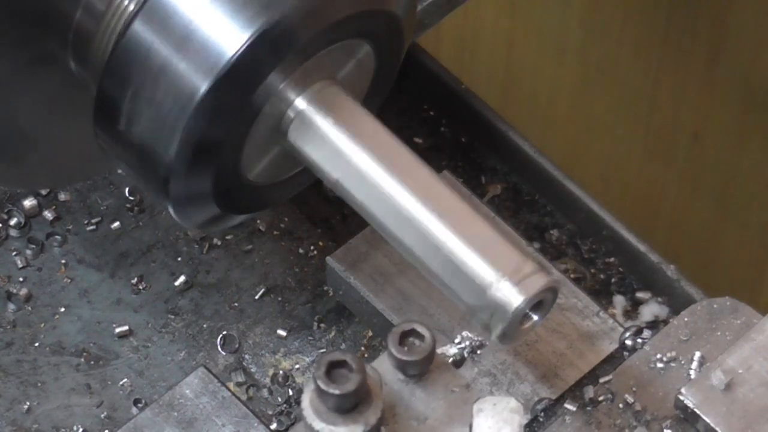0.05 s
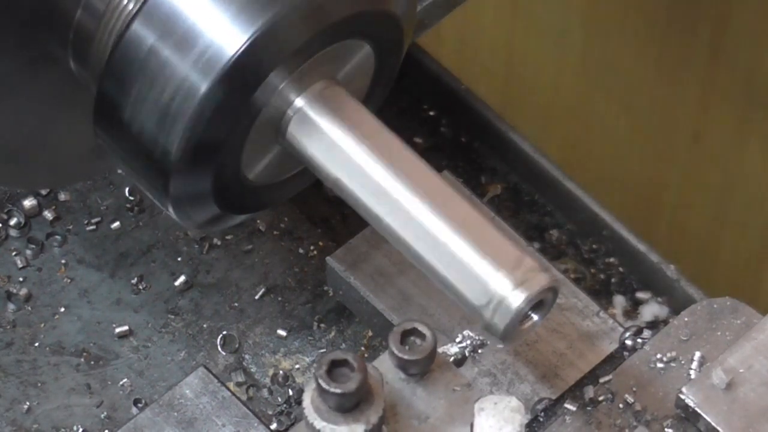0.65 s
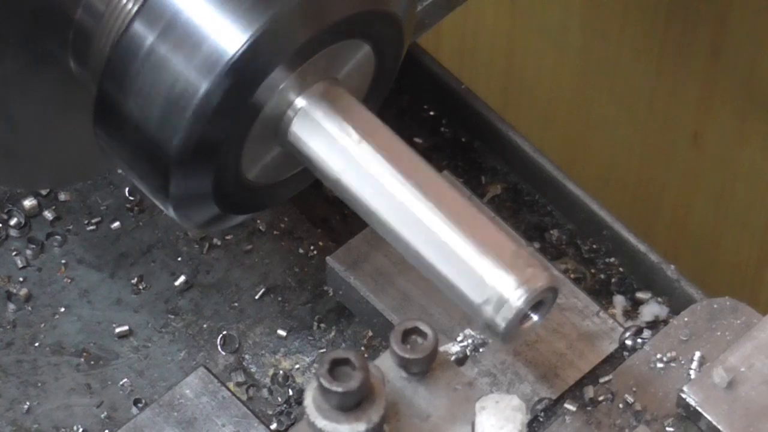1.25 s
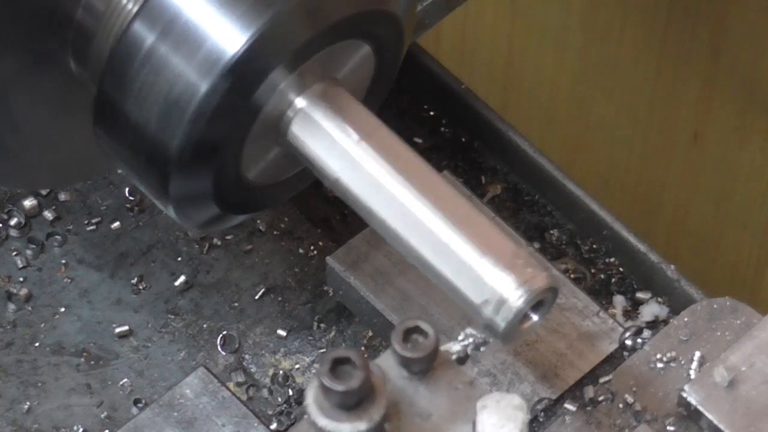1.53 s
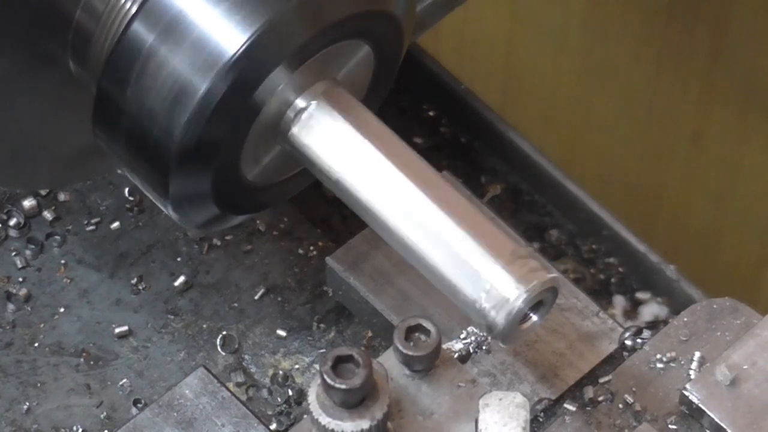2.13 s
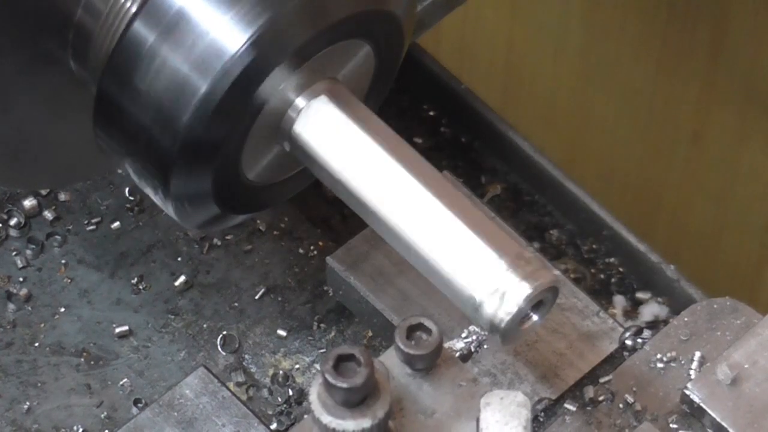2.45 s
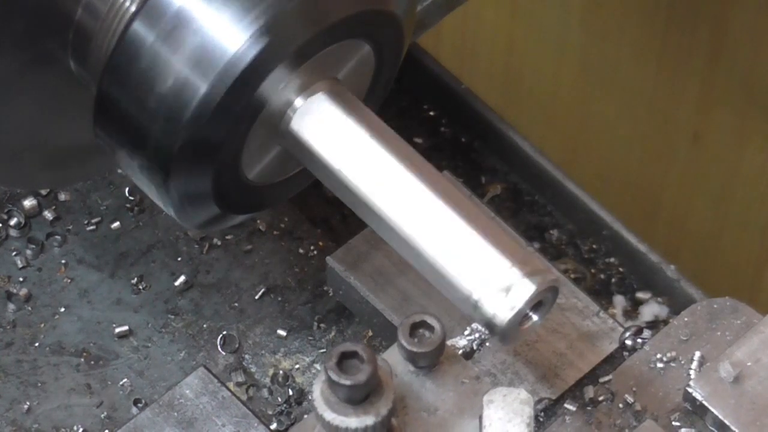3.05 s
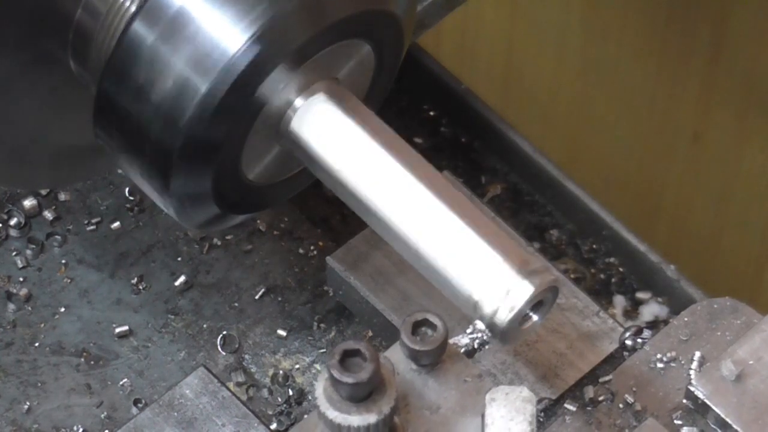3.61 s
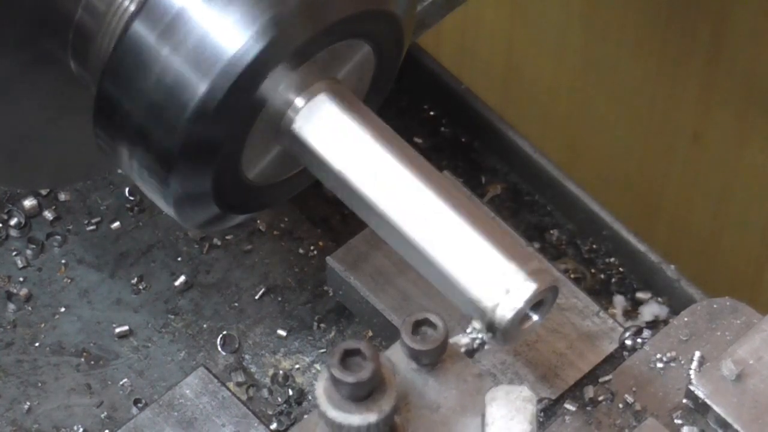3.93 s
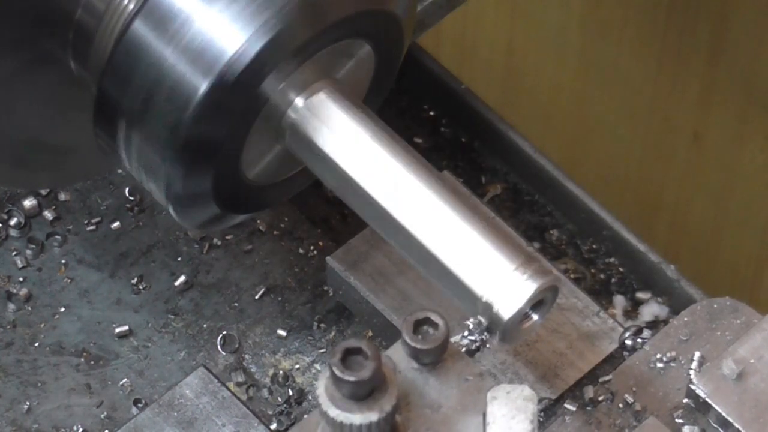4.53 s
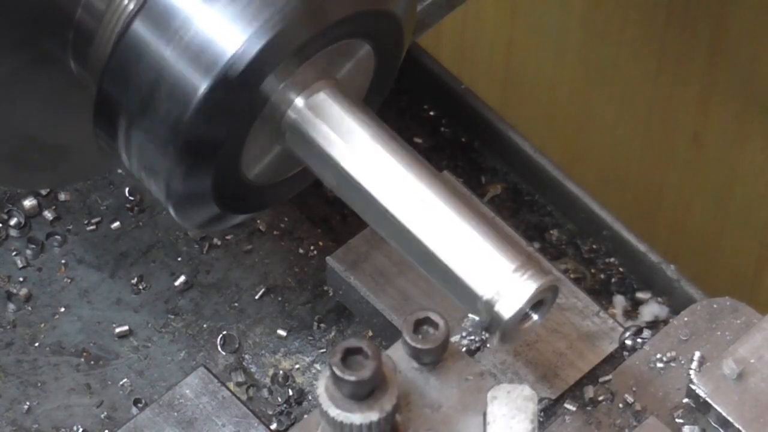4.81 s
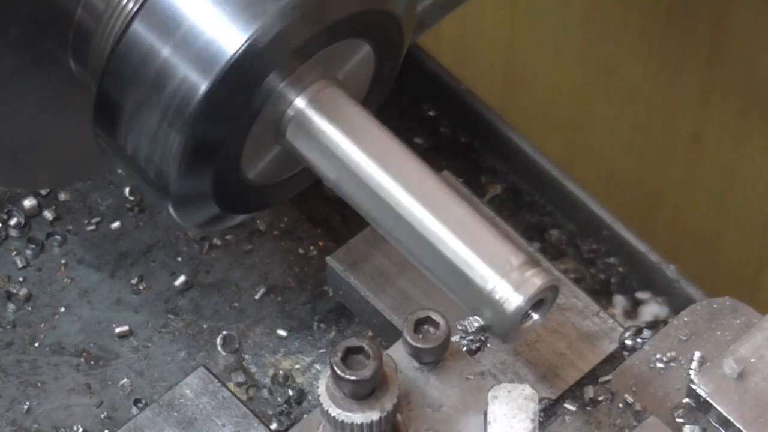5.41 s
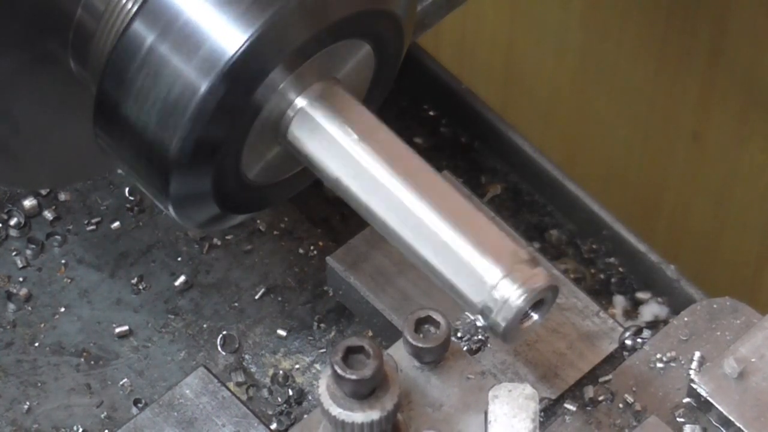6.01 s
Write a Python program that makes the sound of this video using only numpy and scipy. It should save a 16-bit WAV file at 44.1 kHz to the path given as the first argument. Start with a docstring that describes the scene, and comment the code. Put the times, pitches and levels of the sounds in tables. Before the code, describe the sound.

A lathe idles in a small workshop with a steady motor hum, whining, rumbling gears and a bearing hiss. Faint belt scuffs and rattles of metal shavings come through. A little past halfway the tool grazes a spinning steel bar, then bites in with loud, rapid knocking, gritty scraping and a ringing chatter. The hot chip starts to sizzle near the end. The microphone is close and the room sounds dull.

```python
"""A lathe idles in a small workshop: the motor hums, the headstock gears whine and rumble, a bearing
hisses, the belt scuffs and loose swarf rattles. Near 3.5 s a spinning stainless bar grazes the parting tool.
From 3.9 s the tool bites twice a turn, entering and leaving an arc of metal; the chip rubs without pause
and the tool chatters. As the groove deepens the arc widens, the thuds soften and the hot chip sizzles."""
import sys
import numpy as np
from scipy import signal
from scipy.fft import rfft, irfft
from scipy.io import wavfile
from scipy.ndimage import uniform_filter1d, minimum_filter1d

SR = 44100
rng = np.random.default_rng(int(sys.argv[2]) if len(sys.argv) > 2 else 0)


def transcribe(signal):
    """Save signal, clipped to [-1, 1], as a 16-bit WAV file at the path in sys.argv[1]."""
    frames = np.atleast_2d(signal).T
    limited = np.clip(frames, -1, 1)
    pcm = np.round(limited * 32767).astype(np.int16)
    wavfile.write(sys.argv[1], SR, pcm)


N = 276066
TIME = np.arange(N) / SR
FREQ = np.maximum(np.arange(4097) * SR / 8192, 1)
HUM_HZ = 99.9  # twice the mains frequency
TURN_S, CUT_START_S = .04665, 3.922  # one turn of the spindle; the first full bite

# the high side of the bar brushes the tool before the cut: (time [s], knock [dB], grit [dB], rub [dB])
GRAZES = [(3.458, -42, -50, -37.5), (3.505, -39, -41.5, -34), (3.690, -12, -23.5, -24.5),
          (3.737, -18, -31.5, -24), (3.875, -18, -32, -24)]
# how hard the cut works: (time [s], entry knock [dB], exit knock [dB], chip rub [dB], entry grit [dB])
CUT = [(3.92, -11, -15, -34, -25), (4.1, -17, -18, -26, -28), (4.2, -20, -16.5, -26.5, -31.5),
       (4.34, -16, -15.5, -27.5, -29.5), (4.48, -22.5, -18.5, -27.5, -33.5),
       (4.64, -18.5, -15.5, -26.5, -30), (4.75, -22.5, -17, -26.5, -34.5), (4.9, -17.5, -20, -25.5, -32.5),
       (5.09, -17, -16.5, -24, -31.5), (5.16, -17, -22, -25.5, -33.5), (5.27, -15.5, -14, -24, -30),
       (5.44, -19.5, -25, -28, -37.5), (5.63, -16.5, -15.5, -24, -32.5), (5.72, -16, -19, -24.5, -36),
       (5.87, -18.5, -24, -25, -35), (6.115, -16, -27, -26.5, -41.5), (6.165, -27.5, -27, -27, -40)]


def undb(db):
    """Decibels to gain."""
    return 10 ** (np.asarray(db) / 20)


def curve(rows, column=1):
    """Automation lane: one column of a timed table, joined by straight lines."""
    rows = np.array(rows)
    return np.interp(TIME, rows[:, 0], rows[:, column])


def colour(points):
    """An EQ curve in dB, joined on a log-frequency axis."""
    hz, db = np.transpose(points)
    return np.interp(np.log(FREQ), np.log(hz), db)


def resonance(hz, width, db):
    """A bell-shaped lift in a spectrum."""
    return db / (1 + (2 * (FREQ - hz) / width) ** 2)


def response(db):
    """Minimum-phase impulse response with this spectrum."""
    cepstrum = irfft(np.log(undb(db)))
    half = len(FREQ) - 1
    cepstrum[1:half] *= 2
    cepstrum[half + 1:] = 0
    return irfft(np.exp(rfft(cepstrum)))[:half]


def ring(force, db):
    """Send a force through a body with this spectrum, scaled to unit energy."""
    body = response(db)
    return signal.fftconvolve(force, body / np.linalg.norm(body))[:N]


def walk(rate):
    """Smooth random drift with spread 1 that changes about rate times a second."""
    hold = max(int(SR / rate), 1)
    steps = np.repeat(rng.standard_normal(N // hold + 2), hold)
    smooth = uniform_filter1d(uniform_filter1d(steps, hold), hold)[:N]
    return smooth / smooth.std()


def crackle(rate, scatter_db):
    """Tiny clicks of uneven size, rate a second, with power 1."""
    sizes = rng.choice([-1, 1], N) * undb(scatter_db * rng.standard_normal(N))
    clicks = sizes * (rng.random(N) < rate / SR)
    return clicks / clicks.std()


def blows(times, db):
    """One sharp impulse at each time."""
    force = np.zeros(N)
    np.add.at(force, np.clip((times * SR).astype(int), 0, N - 1), undb(db))
    return force


def bursts(times, db, peak_s, sharp):
    """Envelope of pushes that peak after peak_s and die away; a higher sharp makes them tighter."""
    age = np.arange(1, SR // 10) / SR / peak_s
    return signal.fftconvolve(blows(times, db), (age * np.exp(1 - age)) ** sharp)[:N]


def tone(hz, db):
    """A sine on a moving pitch, with this rms level."""
    return np.sqrt(2) * undb(db) * np.sin(2 * np.pi * (np.cumsum(hz) / SR + rng.random()))


def echoes(sound, t60, delay_s, db):
    """A dying cloud of reflections."""
    age = np.arange(SR // 2) / SR
    fade = np.exp(-np.log(1000) * age / t60) * (age > delay_s)
    cloud = rng.standard_normal(len(age)) * fade / np.linalg.norm(fade)
    return undb(db) * signal.fftconvolve(sound, cloud)[:N]


def belt(delay_s, width_s):
    """A smooth bump from 0 to 1 each time the stiff spot of the drive belt comes round."""
    pass_s, period_s = 0.283, .2668
    offset = (TIME - pass_s - delay_s + period_s / 2) % period_s - period_s / 2
    return np.exp(-(offset / width_s) ** 2)


def drive_tones():
    """Mains hum that dips with the belt, motor tones, and gear tones wavering with the play of the teeth."""
    # motor hum, sinking as the cut takes hold and then recovering: (time [s], level [dB])
    hum_levels = [(0, -36.5), (3.8, -36.5), (4.1, -45.5), (4.6, -45.5), (5.2, -42), (5.7, -40.5),
                  (6.1, -36)]
    # magnetic and rotor-slot tones: (pitch [Hz], level [dB])
    motor_tones = [(299.8, -49), (399.7, -48), (499.6, -45), (599.4, -58.5), (799.1, -52.5), (899.2, -59),
                   (1091.3, -66), (1291.0, -47), (1390.9, -48), (1490.8, -55), (1790.6, -67)]
    # whine of the gear teeth: (pitch [Hz], level [dB])
    gear_tones = [(422, -55), (818.6, -50.5), (868.4, -49.5), (968.0, -60), (1167.8, -55), (1216.6, -56),
                  (1539.0, -61)]
    dip_db = 4.7 * belt(delay_s=0, width_s=0.018)
    hum = tone(HUM_HZ + 0.19 * walk(5.0), curve(hum_levels) + 0.55 + 1.3 * walk(21.9) - dip_db)
    motor = sum(tone(hz + 0.34 * walk(5.87), db + 1.4 * walk(9.08)) for hz, db in motor_tones)
    gears = sum(tone(hz + 1.21 * walk(11.82), db - 3.5 + 3 * walk(7.4)) for hz, db in gear_tones)
    return hum + motor + gears


def headstock():
    """Gears and bearings rattle finely, throbbing with the motor; the hiss swells with each belt pass."""
    # rumble and hiss of the headstock: (frequency [Hz], gain [dB])
    housing_eq = [(45, -24.5), (110, -5.5), (200, -5.5), (280, -3), (400, -3.5), (500, 2.5), (580, -0.5),
                  (700, -6), (890, -1.5), (1020, -5.5), (1290, -1.5), (1480, -6.5), (1750, -17.5),
                  (2250, -21.5), (2600, -29.5), (4300, -21.5), (5500, -19.5), (9500, -37), (15000, -45.5)]
    throb = 1 + 0.16 * np.sin(2 * np.pi * HUM_HZ * TIME)
    swell_db = 1.6 * belt(delay_s=0.028, width_s=0.019)
    rattle = crackle(rate=3000, scatter_db=1.5) * throb * undb(-39.0 + walk(25.22))
    hiss = crackle(rate=14000, scatter_db=4.0) * throb
    hiss *= undb(-50.5 + swell_db + 0.63 * walk(17) + 1.3 * walk(60))
    grains = crackle(rate=48, scatter_db=2.5) * undb(-61)  # stray grains tick in the bearing
    spectrum = colour(housing_eq) + resonance(hz=5425, width=145, db=6.5)  # a bearing race rings
    treble = 1 / (1 + (2500 / FREQ) ** 8)  # crossover at 2500 Hz
    lows = ring(rattle, spectrum + 10 * np.log10(1 - treble + 1e-9))
    highs = ring(hiss + grains, spectrum + 10 * np.log10(treble + 1e-9))
    return lows + highs


def scuffs():
    """The belt scuffs lightly against its pulley."""
    # belt scuffs: (time [s], level [dB])
    hits = [(.300, -47), (.330, -49), (1.093, -46), (1.368, -50), (1.893, -47), (2.442, -50), (2.70, -48),
            (2.965, -51), (2.992, -47)]
    # their thin rasp: (frequency [Hz], gain [dB])
    scuff_eq = [(2000, -30), (3300, -3), (4300, 4), (5500, 4), (6500, -15), (12000, -37)]
    envelope = bursts(*np.transpose(hits), peak_s=0.0045, sharp=.7)
    return ring(envelope * crackle(rate=4500, scatter_db=2), colour(scuff_eq))


def swarf():
    """Loose curls of metal rattle softly against the machine."""
    # swarf rattles: (time [s], level [dB])
    hits = [(.2, -51), (.75, -52), (1.138, -42), (1.865, -46), (2.695, -45), (3.648, -39)]
    # ring of the curls: (frequency [Hz], gain [dB])
    curl_eq = [(800, -35), (1700, 10), (2800, -15), (4050, -1), (5200, -10), (9000, -22), (15000, -38)]
    envelope = bursts(*np.transpose(hits), peak_s=0.0046, sharp=0.92)
    return ring(envelope * crackle(rate=3800, scatter_db=-0.5), colour(curl_eq))


def steel():
    """Spectrum of tool, post and bar ringing together."""
    # their broad tone colour: (frequency [Hz], gain [dB])
    body_eq = [(130, -10.5), (220, -1), (450, 0.5), (700, -10.5), (1100, -5), (1600, -3.5), (2200, -11.5),
               (3000, -14.5), (4500, -18.5), (6500, -25), (9000, -34), (15000, -49.5)]
    # their resonances: (frequency [Hz], width [Hz], lift [dB])
    modes = [(255, 37, 9), (363.6, 103, 9), (589.7, 71, 13), (724.5, 68, 11.5), (792, 140, 4.5),
             (914, 120, 10.5), (996, 123, 3), (1191, 110, 7), (1284, 33, 4.5), (1478, 18, 7.5),
             (1910, 35, 2), (2048, 62, 5), (2194, 56, 7.5), (2540, 25, 0), (2600, 19, 5), (4030, 100, 4.5),
             (4400, 160, 7), (4850, 170, 5.5), (5260, 270, 5)]
    return colour(body_eq) + sum(resonance(*mode) for mode in modes)


def recut(roughness, memory=.48):
    """The tool meets the marks it left one turn before, so its coarser roughness partly repeats."""
    turn = int(TURN_S * SR)
    by_turn = np.resize(roughness, (N // turn + 1, turn))
    marks = signal.lfilter([1], [1, -memory], by_turn, axis=0).ravel()[:N]
    lowpass = signal.butter(2, 2300, fs=SR, output="sos")
    return roughness + signal.sosfiltfilt(lowpass, marks / marks.std() - roughness)


def engaged():
    """Fades from 0 to 1 over the turn in which the cut takes hold."""
    return np.clip((TIME - CUT_START_S) / TURN_S + 1, 0, 1)


def arcs():
    """When the tool enters the metal on each turn, and when it leaves."""
    # the cutting arc, widening with depth: (time [s], duration [s])
    arc_lengths = [(3.9, 0.011), (6.26, 0.0298)]
    start = CUT_START_S + TURN_S * np.arange(int((TIME[-1] - CUT_START_S) / TURN_S) + 1)
    return start, start + np.interp(start, *np.transpose(arc_lengths))


def rubbing():
    """The chip sticks and slips over the tool face after each graze and all through the cut."""
    # force of the sliding chip: (frequency [Hz], gain [dB])
    slide_eq = [(50, -27), (130, 5.5), (200, -2.5), (280, -7.5), (450, 4.5), (900, -5), (1800, 1.5),
                (2900, 0), (4500, -6.5), (9000, -2), (15000, -6)]
    graze_s, _, _, graze_db = np.transpose(GRAZES)
    swell_db = 0.1 * np.cos(2 * np.pi * (TIME - CUT_START_S - 0.022) / TURN_S)
    pressure = engaged() * undb(curve(CUT, column=3) + swell_db)
    pressure += bursts(graze_s, graze_db, peak_s=.014, sharp=0.8)
    slips = recut(crackle(rate=7000, scatter_db=3.0)) * pressure * undb(1.07 * walk(90))
    return ring(slips, steel() + colour(slide_eq))


def sizzle():
    """The hot chip sizzles as the groove deepens."""
    # rise of the sizzle: (time [s], level [dB])
    levels = [(3.7, -90), (3.95, -66), (5.3, -68), (5.85, -52.5), (6.26, -50)]
    # its bright fizz: (frequency [Hz], gain [dB])
    fizz_eq = [(4000, -12), (6300, 7), (7200, -2), (8100, 7), (8550, 5), (8950, -5), (9400, -7), (9900, 5),
               (11000, -7), (16000, -15)]
    fizz = crackle(rate=9100, scatter_db=5.5) * undb(curve(levels) + 3.9 * walk(90))
    return ring(fizz, colour(fizz_eq))


def chatter():
    """The cut keeps tool and post swinging at their own pitches; the tool swings widest after each exit."""
    # the tool's main swing, a little higher in a deeper groove: (time [s], level [dB], pitch [Hz])
    swing = [(3.9, -34, 360), (4.15, -21.5, 357), (4.33, -29, 358), (4.39, -22.5, 355), (4.6, -23.5, 356),
             (4.9, -27.5, 364), (5.02, -19.5, 364), (5.12, -16.5, 366), (5.19, -25.5, 364),
             (5.3, -20.5, 366), (5.4, -13.5, 367), (5.46, -24, 368), (5.55, -18.5, 368), (5.78, -22, 366),
             (5.87, -16, 364), (5.94, -21.5, 366), (6.19, -22.5, 366), (6.24, -17.5, 364)]
    # higher modes of the tool: (pitch [Hz], level relative to the chip rub [dB])
    high_modes = [(929, -10), (1185, -17.5)]
    # shudder of the tool post, dropping out abruptly near 4.8 s: (time [s], level [dB])
    shudder = [(3.92, -30), (4.15, -29.5), (4.36, -34.5), (4.55, -35.5), (4.78, -26.5), (4.82, -53),
               (5.08, -44), (5.26, -28), (5.42, -42), (6.26, -37)]
    start, leave = arcs()
    exit_swell_db = 4.5 * bursts(leave, 0, peak_s=.008, sharp=2.5)
    entry_swell_db = 2.2 * bursts(start, 0, peak_s=0.0078, sharp=9.4)
    swing_db = curve(swing) + exit_swell_db + entry_swell_db
    rub_db = curve(CUT, column=3)
    jolts_hz = 14 * recut(walk(150))
    tool = tone(curve(swing, column=2) + jolts_hz, swing_db - 3.4 + 1.8 * walk(110))
    growl = tone(390 + 22 * walk(150), swing_db - 13 + 2 * walk(110))  # a second swing roughens the first
    singing = sum(tone(hz + 4.5 * walk(90), rub_db + db + 1.2 * walk(60)) for hz, db in high_modes)
    post = tone(275.4 + 1.77 * walk(50), curve(shudder) + 0.52 * walk(40))
    return engaged() * (tool + growl + singing + post)


def ring_chips(force, db, patchy_db=2.2):
    """Like ring, but every turn makes a new curl of chip with a colour of its own."""
    turn = int(TURN_S * SR)
    bands_hz = np.linspace(0, SR / 2, 45)
    out = np.zeros(N + turn + len(FREQ))
    for i in range(int(GRAZES[0][0] / TURN_S) * turn, N, turn):
        curl = response(db + patchy_db * np.interp(FREQ, bands_hz, rng.standard_normal(len(bands_hz))))
        piece = signal.fftconvolve(force[i:i + turn], curl / np.linalg.norm(curl))
        out[i:i + len(piece)] += piece
    return out[:N]


def chips(entry, grit_db, snap_db, end, end_db):
    """The chip crumbles and snaps at both ends of the arc; the edge scrapes while it is in the metal."""
    # the chip breaks off hard as a bite begins: (time [s], snap [dB], grit [dB])
    breaks = [(3.922, -29.5, -36), (3.968, -42, -43), (4.015, -40, -43), (4.062, -41, -55),
              (4.108, -48, -37), (4.155, -40, -59), (4.388, -49, -36), (4.528, -47, -53), (4.574, -45, -57),
              (4.621, -47, -52), (4.668, -45, -35), (4.714, -50, -40), (4.854, -43.5, -54),
              (4.901, -40, -52), (4.948, -40, -42), (4.995, -47, -43), (5.135, -40, -61), (5.181, -38, -60),
              (5.228, -41.5, -47), (5.275, -51, -55), (5.369, -45, -48), (5.509, -33, -38),
              (5.556, -47, -33), (5.601, -39, -59), (5.694, -38, -55), (5.741, -36, -50), (5.788, -46, -32),
              (5.835, -48, -36), (5.975, -41, -55), (6.068, -44, -37), (6.115, -55, -35.5)]
    # crunch of the crumbling chip: (frequency [Hz], gain [dB])
    grit_eq = [(900, -22), (2700, -3), (4200, 2), (7500, 1), (11000, -1)]
    # bright click of the snapping chip: (frequency [Hz], gain [dB])
    snap_eq = [(2500, -35), (6000, -11.5), (9000, -5), (13000, 9.5), (16000, -8)]
    break_s, break_snap_db, break_grit_db = np.transpose(breaks)
    onsets = np.r_[break_s, entry]
    start, leave = arcs()
    in_metal = np.searchsorted(start, TIME) - np.searchsorted(leave, TIME)
    scrape = undb(-48) * in_metal
    grit = bursts(onsets, np.r_[break_grit_db, grit_db] + 3.5, peak_s=0.0031, sharp=0.7)
    grit += bursts(end, np.maximum(end_db - 17.5, -38), peak_s=0.0025, sharp=0.6)
    snap = bursts(onsets, np.r_[break_snap_db, snap_db] + 2.0, peak_s=0.0014, sharp=0.7)
    snap += bursts(end, end_db - 29, peak_s=0.00099, sharp=0.91)
    fractures = crackle(rate=12000, scatter_db=3)
    crunch = ring_chips((grit + scrape) * fractures, steel() + colour(grit_eq))
    return crunch + ring_chips(snap * fractures, steel() + colour(snap_eq))


def segments(times, hz, slip_cycles=0.18):
    """Buzz of chip segments at a nearly even rate, restarting at each of these times."""
    age = TIME - times[np.maximum(np.searchsorted(times, TIME) - 1, 0)]
    cycles = hz * age + slip_cycles * recut(walk(700))
    return np.sqrt(2) * np.sin(2 * np.pi * cycles) * undb(walk(1200))


def shearing(entry, entry_db, end, end_db):
    """In each bite the chip shears off in segments, a little faster on the way out."""
    _, leave = arcs()
    going_in = bursts(entry, entry_db - 12, peak_s=0.0046, sharp=3.0) * segments(entry, hz=1016)
    going_out = bursts(end, end_db - 13.5, peak_s=0.0036, sharp=2.4) * segments(leave, hz=1149)
    return ring(going_in + going_out, steel())


def thuds(entry, entry_db, end, end_db):
    """The step in cutting force at each end of the arc thuds twice, less as the groove deepens."""
    # weight of a thud: (frequency [Hz], gain [dB])
    thud_eq = [(100, -19), (300, -6.5), (480, 6), (640, 7.5), (850, 2.5), (1200, -7), (2200, -10),
               (4000, -13)]
    jitter_s, rebound_s, fade_db_per_s = .00015, 0.00575, 6.5
    steps = np.r_[entry, end] + jitter_s * rng.standard_normal(len(entry) + len(end))
    steps_db = np.r_[entry_db, end_db - 3] + 19 - fade_db_per_s * (steps - CUT_START_S)
    force = blows(steps, steps_db) + blows(steps + rebound_s, steps_db + 0.5)
    return ring(force, steel() + colour(thud_eq))


def knocks(entry, entry_db, end, end_db):
    """A short, rough push knocks the tool as the cut begins and again as it runs out."""
    # force of a knock: (frequency [Hz], gain [dB])
    knock_eq = [(40, -53), (110, -14), (220, -8), (400, -5), (650, -2.5), (1050, 4.5), (1600, 1),
                (2200, 0.5), (3300, -13), (8000, -24)]
    push = bursts(entry, entry_db + 1.9, peak_s=0.0045, sharp=1.2)
    push += bursts(end, end_db - 1.9, peak_s=0.0035, sharp=1.6)
    roughness = recut(crackle(rate=22000, scatter_db=1))
    return ring(push * roughness, steel() + colour(knock_eq))


def bites():
    """Every graze, entry and exit layers shear, thud, knock and chip noise; each turn is a little uneven."""
    # the tool catches hard as it leaves the arc: (time [s], level [dB])
    catches = [(4.028, -20), (4.216, -12.5), (4.310, -27), (4.545, -16), (4.828, -19), (4.874, -32),
               (4.968, -16.5), (5.109, -23), (5.251, -28), (5.391, -26)]
    catch_s, catch_db = np.transpose(catches)
    graze_s, graze_knock_db, graze_grit_db, _ = np.transpose(GRAZES)
    start, leave = arcs()
    turn_entry_db, turn_exit_db, turn_grit_db = (np.interp(start, TIME, curve(CUT, c)) for c in (1, 2, 4))
    scatter_db = rng.standard_normal((len(start), 4)) * [0.67, 0.67, 3, 0.67]
    entry, end = np.r_[graze_s, start], np.r_[catch_s, leave]
    entry_db = np.r_[graze_knock_db, turn_entry_db + scatter_db[:, 0]]
    grit_db = np.r_[graze_grit_db, turn_grit_db + scatter_db[:, 1]]
    snap_db = np.r_[graze_grit_db - 19, -59 + scatter_db[:, 2]]
    end_db = np.r_[catch_db, turn_exit_db + scatter_db[:, 3]]
    tool = sum(layer(entry, entry_db, end, end_db) for layer in (shearing, thuds, knocks))
    return tool + chips(entry, grit_db, snap_db, end, end_db)


def scene():
    """Machine and cut, close and central; the lathe bed and dull workshop walls mirror them to the sides."""
    # stereo width of the reflections: (frequency [Hz], side gain [dB])
    width_eq = [(100, -13), (380, -12), (700, -7), (1300, -2.5), (2400, 0.5), (4400, -8), (8000, 0.5),
                (15000, 4.5)]
    noises = bites() + rubbing() + sizzle() + headstock() + swarf() + scuffs()
    tones = drive_tones() + chatter()
    wall_db = colour([(300, 1.5), (4500, -1.0), (9000, -4.0), (15000, -8)])
    dull = signal.fftconvolve(noises, response(wall_db))[:N]
    mid = noises + echoes(dull, t60=0.4, delay_s=.008, db=-10.0) + tones
    bed = echoes(noises, t60=0.022, delay_s=0.00072, db=-7.5)
    walls = echoes(dull, t60=0.49, delay_s=0.006, db=-14.5)
    side = signal.fftconvolve(bed + walls, response(colour(width_eq)))[:N]
    side += undb(-24.5) * signal.hilbert(tones).imag  # the tones reach the ears slightly out of phase
    lean_db = .3  # the machine stands a little to the right
    return np.array([undb(-lean_db) * mid + side, undb(lean_db) * mid - side])


def record(dry):
    """A fast limiter holds down the hardest bites and the top is cut steeply."""
    ceiling, hold, top_hz = .66, int(.004 * SR), 15800
    held_peak = -minimum_filter1d(-np.abs(dry).max(axis=0), hold)
    peak = uniform_filter1d(held_peak, hold)
    gain = (1 + (peak / ceiling) ** 4) ** -.25
    return signal.sosfilt(signal.ellip(10, .2, 70, top_hz, fs=SR, output="sos"), dry * gain)


dry = scene()
out = record(dry)
transcribe(out)
```